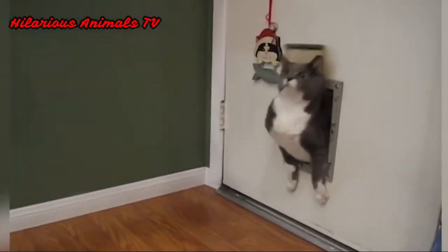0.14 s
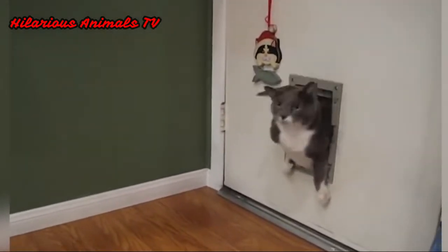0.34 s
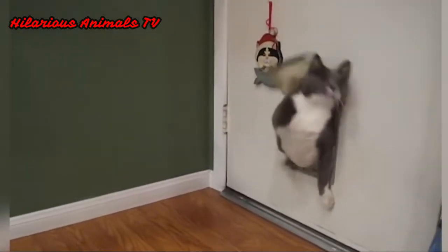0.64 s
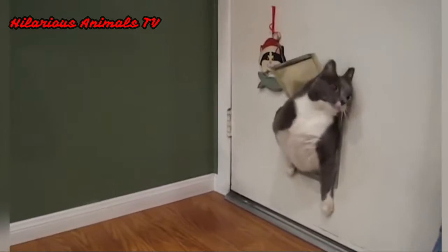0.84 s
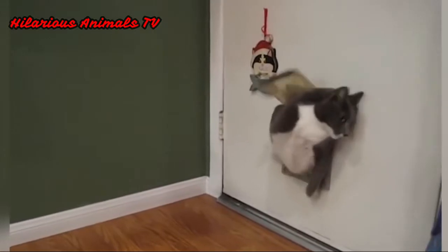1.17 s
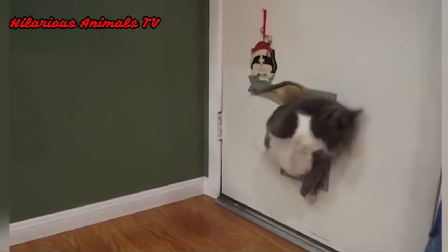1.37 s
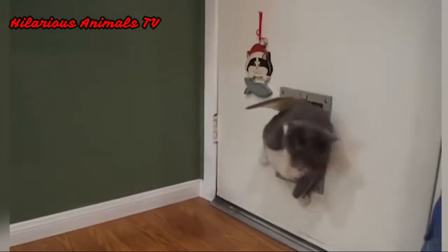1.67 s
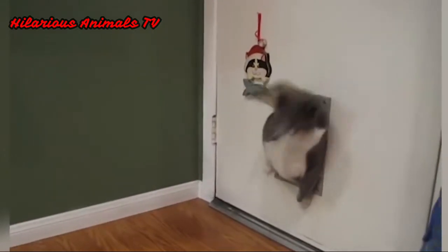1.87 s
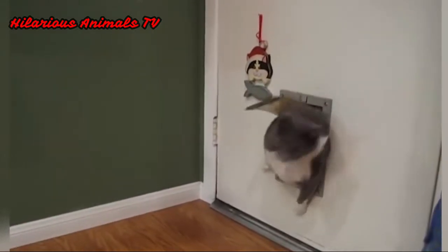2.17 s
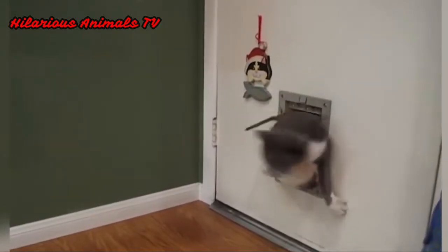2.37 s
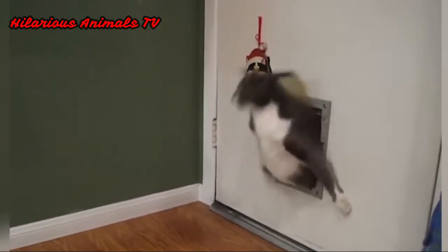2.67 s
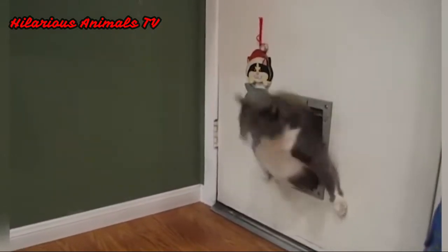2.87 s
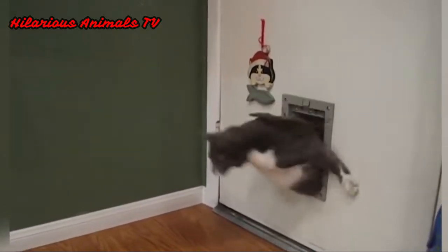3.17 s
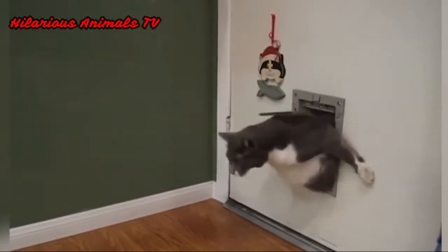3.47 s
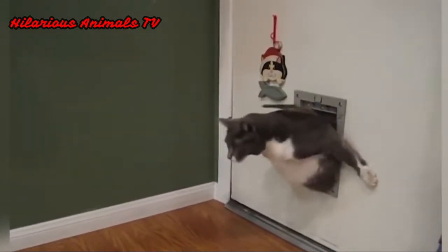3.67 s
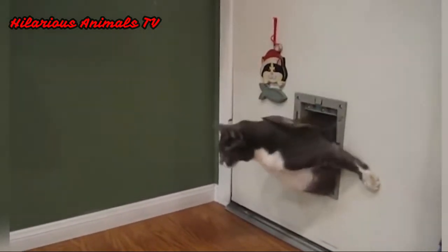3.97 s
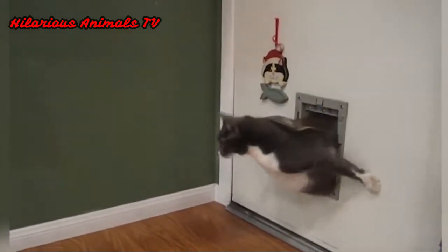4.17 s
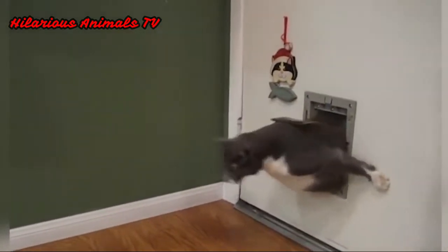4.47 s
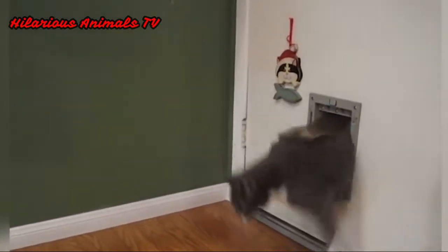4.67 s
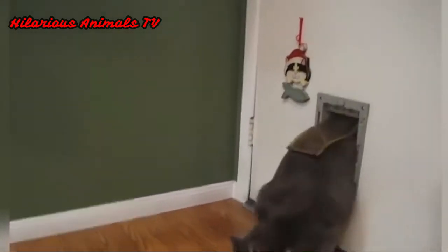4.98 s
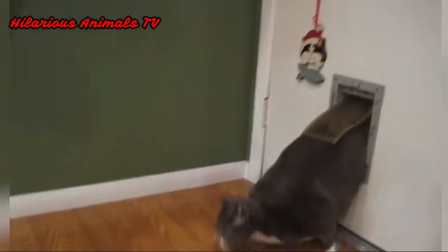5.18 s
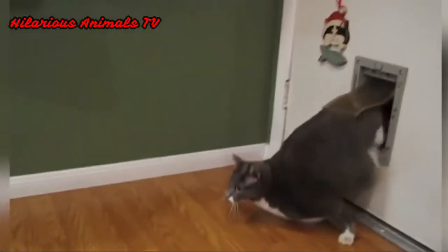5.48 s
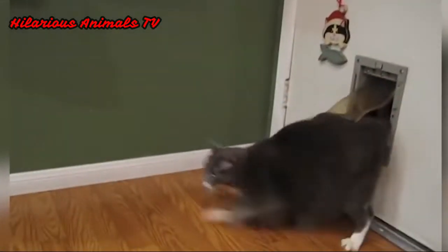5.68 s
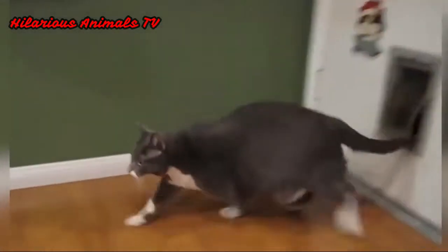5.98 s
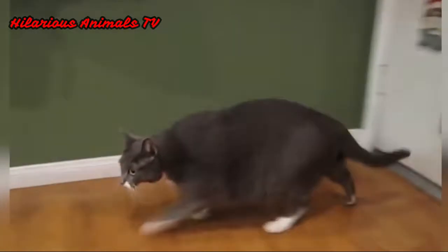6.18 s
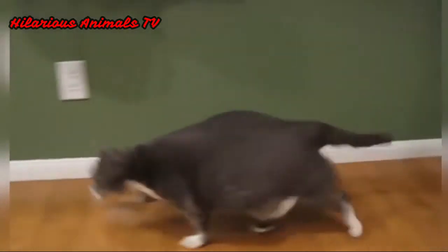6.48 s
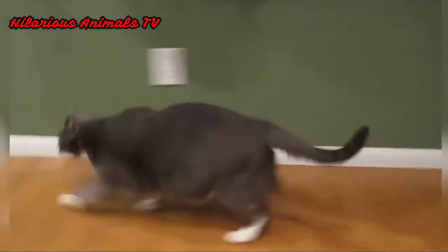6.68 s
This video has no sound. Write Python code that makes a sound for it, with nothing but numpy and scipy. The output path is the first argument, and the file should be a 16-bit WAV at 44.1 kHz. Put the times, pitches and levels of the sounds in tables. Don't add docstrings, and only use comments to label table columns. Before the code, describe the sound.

Hard plastic clicks and rattles crowd the first second, then hollow flap slaps come irregularly with scraping and soft thuds from a hollow door. The clatter tightens during the hardest pushes, peaks in one bright snap, then thins to knocks and light paw taps. A small hard room echoes each hit, heard from nearby over a low hum.

```python
import sys
import numpy as np
from scipy import signal
from scipy.fft import rfft, irfft
from scipy.io import wavfile
from scipy.ndimage import uniform_filter1d

SR = 44100
rng = np.random.default_rng(int(sys.argv[2]) if len(sys.argv) > 2 else 0)


def natural_amplitude(level_db):
    exponent = np.asarray(level_db, float) / 20
    return 10 ** exponent


def digitize_waveform(pressure):
    field = np.atleast_2d(pressure).T
    bounded = np.clip(field, -1, 1)
    quanta = np.round(bounded * 32767).astype(np.int16)
    wavfile.write(sys.argv[1], SR, quanta)


N = 301189

# frequency in Hz, level in dB per Hz.
HUM_SPECTRUM = [(15, -31), (25, 31.5), (64, -13.5), (263, 3), (677, -5.5), (1290, -3), (1480, -10),
                (1890, -6), (2050, -13), (3920, -14), (6050, -17.5), (14400, -27), (16000, -36)]
HUM_DB, HUM_PATCH_DB = -53.5, 2.4

# time in seconds, pressure in dB, claw scrape in dB over pressure.
SLIDING = [(0.0, -41, 15), (0.15, -44.5, -25), (0.28, -44, 0.5), (0.59, -43.5, -13), (1.06, -56.5, -1),
           (1.22, -47, -15), (1.45, -55, 5), (1.86, -48.5, -4.5), (1.98, -33.5, -4), (2.13, -54, -5.5),
           (2.78, -41, -6), (3.25, -49.5, -20), (3.48, -36, 3), (3.69, -51.5, -20), (4.11, -37.5, -15),
           (4.77, -49.5, -3), (5.14, -47.5, 6), (5.4, -48.5, -11)]
REST_S, REST_DB = 6.1, -6.5
GRIT_PER_S, GRIT_DB, GRIT_UNEVEN_DB = 120, -2.5, 3.0

# start in seconds, level in
# dB, ring in Hz, t60 in ms.
RAPS = [(.0005, -32, 4000, 8), (.0085, -29, 4100, 8), (.0145, -34, 4000, 8), (.02, -33, 4200, 8),
        (.038, -30, 4000, 8), (.043, -33, 4200, 8), (.2045, -31, 4200, 8), (.2245, -33, 4100, 8),
        (.728, -32, 260, 60), (.81, -31, 430, 50), (1.056, -25, 770, 50), (1.064, -28, 780, 30),
        (1.4078, -15, 1270, 22), (1.408, -22, 1800, 15), (1.416, -17, 1120, 22), (1.4215, -19, 920, 15),
        (1.431, -24, 1200, 20), (1.8785, -23, 600, 25), (1.952, -14, 780, 30), (1.954, -18, 1200, 25),
        (1.999, -21, 1000, 15), (2.538, -11, 4500, 8), (2.5375, -16, 7800, 5), (2.5375, -18, 14200, 4),
        (2.539, -13, 1700, 25), (2.544, -13, 760, 35), (2.551, -14, 800, 25), (4.0103, -29, 4070, 10),
        (4.0, -30, 3900, 8), (4.3, -31, 5300, 10), (4.312, -32, 5100, 10), (4.0292, -23, 4600, 8),
        (4.0342, -22, 4300, 8), (3.991, -28, 2200, 8), (4.039, -26, 5400, 8), (4.051, -27, 6100, 8),
        (4.047, -25, 4000, 12), (4.6025, -4, 4450, 8), (4.603, -13, 3500, 8), (4.603, -13.5, 1900, 12),
        (4.609, -20, 1120, 30), (4.617, -19, 4500, 10), (5.679, -37, 1300, 15), (5.681, -40, 3200, 10),
        (5.692, -23, 560, 30), (5.6925, -26, 1100, 20), (5.692, -29, 1760, 15), (5.72, -31, 600, 20),
        (2.538, -17, 3300, 10), (2.541, -17, 1370, 25), (3.257, -36, 4600, 8), (3.257, -38, 2600, 10),
             (3.2915, -22, 4000, 10), (3.2915, -28, 5600, 6), (3.4255, -21, 4700, 8), (3.426, -22, 3100, 8),
             (3.4255, -26, 7800, 5), (3.565, -33, 5500, 6), (3.642, -30, 7500, 5), (3.648, -23, 2800, 8),
             (3.648, -28, 1300, 12), (4.03, -28, 2900, 15), (4.045, -29, 3000, 12), (5.1, -30, 2850, 10),
             (5.1, -33, 900, 12), (5.118, -22, 1950, 12), (5.118, -27, 4400, 8), (5.118, -33, 6400, 6),
             (5.1265, -21, 1950, 10), (5.127, -21, 1000, 25), (5.128, -31, 6450, 8), (5.159, -32, 6750, 8)]
# start in seconds, level in dB, ring in Hz, t60 in ms.
THUMPS = [(.34, -36, 290, 80), (1.872, -27, 140, 200), (1.95, -33, 90, 200), (2.793, -31, 150, 120),
          (2.9, -34, 250, 120), (3.221, -28, 130, 120), (3.3, -33, 150, 200), (4.05, -38, 110, 250),
          (4.0, -37, 450, 60), (3.38, -34, 170, 150), (4.79, -36, 60, 300), (5.118, -30, 95, 200),
          (5.12, -27, 430, 60), (5.93, -46, 280, 80), (6.25, -43, 180, 100), (6.48, -43, 130, 120)]
RAP_RISE_CYCLES, RAP_PAIR_RATIO = .8, 1.09
RAP_BLUR, RAP_WALLS_DB = 2.5, -2.0

# start in seconds, level in dB, upper ring in dB over the tick.
RATTLES = [(0.0074, -29.5, -8.5), (0.0172, -37, -18), (0.0255, -27, -25), (0.0325, -26, -20),
           (0.047, -27, -14.5), (0.1017, -38, -13), (0.1531, -25.5, -31), (0.174, -21, -24),
           (0.1902, -20.5, -22), (0.2114, -19, -21), (0.229, -23, -19), (0.243, -24.5, -21),
           (0.268, -23, -20.5), (0.3927, -24, -19.5), (0.4057, -26, -34), (0.478, -27, -29),
           (0.484, -25.5, -29), (0.553, -26, -23), (0.5757, -21, -27), (0.707, -26.5, -31)]
# frequency in Hz, level in dB, t60 in seconds.
HINGE_LOW = [(3900, 4, 0.0033), (4350, 3, 0.0055), (5540, 2.5, 0.00087)]
# frequency in Hz, level in dB, t60 in seconds.
HINGE_HIGH = [(8760, -1, 0.0025), (10050, -7.5, 0.012), (10700, -2, 0.0039)]

# strongest push in seconds, boom in dB, build-up and let-go in seconds.
SHOVES = [(0.07, -32.5, 0.053, 0.23), (0.36, -32, .1, 0.22), (1.27, -36, 0.11, 0.3), (2.11, -44, .25, .12),
          (2.51, -21, 0.086, 0.019), (2.6, -44, .08, .5), (3.23, -29, 0.085, 0.13), (3.5, -22, 0.041, 0.12),
          (3.65, -27, 0.041, 0.12), (3.76, -27.5, .08, 0.038), (4.41, -28, .1, 0.31),
          (5.12, -35.5, 0.11, 0.21)]
# time in seconds, level in dB, let-go in seconds.
JOLTS = [(0.072, -26, 0.13), (0.36, -37, 0.33), (0.63, -34, .5), (1.88, -33, 0.11), (2.51, -38, 0.021),
         (2.61, -38, .9), (3.235, -24, 0.14), (3.65, -32.5, 0.22), (3.76, -33, .25), (4.41, -32.5, 0.29),
         (5.12, -28, 0.21)]
JOLT_RISE_S, SWELL_DB = 0.013, 15.5
SWAY_DB, STILL_DB, STRUGGLE_END_S = -43.5, -52.5, 3.75
PANEL_REST_DB = -51.5

# start in seconds, level in dB, ring in Hz, fizz in dB over the tick.
SNAPS = [(0.0756, -25, 3970, -23), (0.3381, -22, 4500, -23), (0.617, -23, 3480, -21.5),
         (1.0236, -33.5, 3850, -24), (1.044, -28.5, 3300, -20), (1.1758, -22, 3100, -33),
         (1.183, -20.5, 3450, -21.5), (1.269, -26, 3600, -29), (1.4072, -22, 3680, -20.5),
         (1.8895, -30.5, 3400, -31), (1.9469, -20, 4020, -10.5), (2.537, -16, 4150, -8.5),
         (2.536, -12, 4080, -19), (2.6847, -23, 4080, -27), (2.8768, -29, 4130, -13.5),
         (3.287, -22, 3960, -24), (3.376, -24, 3760, -25), (3.42, -23, 3530, -10), (3.5762, -28, 4300, -17),
         (3.6417, -28, 3900, -17), (4.1629, -18, 4300, -29), (4.267, -27, 3550, -28),
         (4.327, -35, 4900, -39), (4.6023, -9, 4300, -27), (4.7995, -30, 3080, -44),
         (5.1177, -31.5, 4270, -12.5), (5.1252, -23, 3700, -26), (5.16, -34, 3440, -13),
         (5.697, -34, 3500, -9), (6.0464, -41, 3300, -8.5)]
# start in seconds, level in dB, fizz in dB over the tick.
CLAWS = [(0.44, -35, -27), (0.5362, -34, -23), (0.806, -41, -16), (1.5503, -40, -14), (1.6815, -38, -21),
         (1.7644, -38.5, -20), (2.4843, -44.5, -13), (2.794, -32.5, -21), (2.842, -35, -24),
         (2.9723, -37, -24), (3.0803, -37, -38), (3.166, -45, -16), (3.2222, -37.5, -17),
         (3.3247, -28, -34), (3.402, -40, -12), (3.9062, -31, -25), (3.942, -30.5, -25.5),
         (4.3865, -44, -24), (4.435, -36.5, -16.5), (5.174, -35, -29), (5.803, -41.5, -13.5),
         (5.9828, -46, -8.5), (6.2798, -40.5, -14), (6.447, -56, -3.5), (6.541, -34.5, -21),
         (6.5457, -38.5, -20), (6.628, -47.5, -11), (6.6975, -36.5, -17), (6.8036, -47.5, -15)]
# multiple of the tick's own ring, level in dB, t60 in seconds.
LATCH = [(.8, 4.5, 0.00053), (1, 4, 0.0027), (1.17, -4.5, 0.0021)]
# frequency in Hz, level in dB, t60 in seconds.
FIZZ = [(6310, 23.5, 0.00063), (9650, 11, 0.0021), (9770, 7, 0.0032), (11460, 6, 0.0014),
        (14500, -3, 0.00039)]
SNAP_MS, SNAP_MS_PER_DB = 6.15, -0.19
CLAW_MS, CLAW_HZ, CLAW_SPREAD_HZ = 5.8, 3900, 67

# start in seconds, blow in dB,
# then door thud, hollow note and frame, each in dB over the blow.
SLAPS = [(0.3431, -26.5, -8.5, -19, -6), (0.3556, -29, -8.5, -19, -31), (0.616, -34, -12, -10, -1),
         (1.0275, -30.5, -9, -9, -2), (1.045, -28.5, -13.5, -5, -3), (1.188, -23, -22, -8.5, -9),
         (1.4078, -21, -16, -9, -11), (1.886, -29.5, -5, 2.5, -2.5), (1.9425, -25, -40, 0, -4.5),
         (1.9473, -19, -24, -12, -18), (2.537, -13.5, -13, -8, -6), (2.793, -31, -10, -1.5, -10),
         (2.906, -23, -10.5, -12, -15), (2.99, -26, -27, -13.5, -15), (3.2851, -23.5, -3.5, -9.5, -11),
         (3.423, -30.5, -5, 7, 2), (3.4965, -28.5, -6, -8, -8), (3.6469, -31, -6, -9.5, -3),
         (3.9909, -30.5, -9, -13, -3.5), (4.1646, -29.5, -3, -9.5, -4), (4.6025, -21, -30, -22, -7),
         (5.1172, -28, 2, -21, -1), (5.125, -22, -3, -12, -10), (5.692, -31, -3, -12, -11)]
# start in seconds, blow in dB, then door thud and frame in dB over the blow.
BUMPS = [(0.0764, -37.5, 1.5, -3), (0.537, -43, -9, -10), (0.6655, -35.5, -13, 0.5),
         (0.8053, -38.5, 5.5, -5.5), (1.1768, -38, -7, -2), (1.585, -37.5, -8.5, 2), (1.8718, -30, 6, -11),
         (2.6804, -32, -2, -1.5), (2.8399, -27.5, -2.5, -16), (3.2235, -38, -1, -8),
         (3.3734, -34, -2.5, -5), (3.8941, -38, -1, -17), (4.3286, -42.5, 4, 1), (4.796, -46.5, 0.5, -2),
         (4.9765, -38.5, -8, -2.5), (5.0998, -47, -12, 4), (5.8019, -42.5, 2, -17), (6.255, -56, 7, -12),
         (6.4468, -52, 1, 5), (6.8018, -42.5, -10, -6)]
SLAP_MS, BUMP_MS, BUMP_HOLLOW_DB = 16.3, 10.4, -9.5
# frequency in Hz, level in dB, t60 in seconds.
FLAP = [(820, -6, .012), (1000, -2, .011), (1200, 3, .012), (1400, 1, .009), (1640, -3, .008)]
# frequency in Hz, level in dB, t60 in seconds.
HOLLOW = [(765, 0, .045), (860, -9, .025)]
# level in dB, first as heard straight, then towards the walls.
HOLLOW_DB = [
    [6.0],
    [-1.0],
]
# frequency in Hz, level in dB, t60 in seconds.
FRAME = [(1754, -3.5, 0.0061), (2220, 5, 0.003), (2560, 3.5, 0.004), (3255, -5.5, 0.0031)]
# frequency in Hz, level in dB, t60 in seconds.
DOOR = [(142.7, 2, 0.052), (208, -10, 0.03), (317.4, -3.5, 0.1), (423, 2, 0.033), (618, -3, 0.036)]

# start in seconds, level in dB,
# centre at the start in Hz, centre at the end in Hz, length in ms.
SWISHES = [(1.574, -43, 3200, 2960, 43), (1.763, -45, 2850, 2520, 38), (2.889, -38, 3140, 3750, 44),
           (3.155, -47, 3280, 3400, 30), (3.564, -33.5, 4100, 4240, 39), (4.0, -33, 3300, 5600, 60),
           (4.29, -42.5, 5030, 4940, 41), (4.489, -41, 3660, 3820, 55), (5.002, -43.5, 2430, 3200, 66),
           (4.985, -45, 1190, 1390, 76), (5.33, -50.5, 312, 342, 144), (4.005, -39, 2300, 1700, 90),
           (1.031, -45, 3060, 3060, 27), (2.961, -40, 1090, 1110, 58)]

# delay in ms, level in dB.
WALLS = [(4.6, -15.5), (8.5, -12.5), (14.5, -15.5), (19, -47), (27, -76)]
# frequency in Hz, t60 in seconds.
ROOM = [(100, 0.3), (260, 0.23), (700, 0.41), (1840, 0.35), (4850, 0.29), (12800, 0.21)]


def evened(x):
    return x / np.sqrt(np.mean(x ** 2) + 1e-20)


def read(points, hz):
    f, value = np.transpose(points)
    return np.interp(np.log(hz + 1), np.log(f + 1), value)


def curves(rows):
    s, *columns = np.transpose(rows)
    return [np.interp(np.arange(N) / SR, s, c) for c in columns]


def add(mix, s, sound):
    part = mix[..., max(round(s * SR), 0):][..., :sound.shape[-1]]
    part += sound[..., :part.shape[-1]]


def band(x, lo_hz, hi_hz):
    edges = [lo_hz, min(hi_hz, .45 * SR)]
    return evened(signal.sosfilt(signal.butter(2, edges, "bandpass", fs=SR, output="sos"), x))


def struck(modes, scale, contact_ms, luck, scatter_db=2.5, first=4.3):
    t = np.arange(len(luck)) / SR
    ring = np.zeros(len(luck))
    for k, (hz, db, t60) in enumerate(modes):
        fade = natural_amplitude(db + scatter_db * luck[k] - 60 * t / t60)
        ring += (-1) ** k * fade * np.sin(2 * np.pi * hz * scale * t)
    life = t[:3072] / (np.clip(contact_ms, .3, 40) / 1000)
    chatter = luck[:3072] * np.minimum(life * 6.6, 1) * np.exp(-1.6 * life ** 1.26)
    chatter[8] = first
    colour = rfft(chatter)
    chatter = irfft(colour / (np.abs(colour) + 1e-9) ** 0.46)
    heard = signal.fftconvolve(chatter, ring)[:len(t)]
    spread = ring * np.linalg.norm(heard) / np.linalg.norm(ring)
    return np.array([heard, spread]) / np.abs(heard).max()


def slips(size, luck, uneven_db=3.5):
    grip = natural_amplitude(uneven_db * np.minimum(luck[1, :size // 64 + 1] ** 2, 4)).repeat(64)[:size]
    return luck[0, :size] * grip


def hum():
    frames, hz = N // 256 + 5, np.fft.rfftfreq(1024, 1 / SR)
    a, b, patches = rng.standard_normal((frames, 513, 3)).T
    patches = uniform_filter1d(patches, size=12, axis=0)
    patches = evened(uniform_filter1d(patches, size=14, axis=1))
    z = (a + 1j * b) * natural_amplitude(read(HUM_SPECTRUM, hz)[:, None] + HUM_PATCH_DB * patches)
    return natural_amplitude(HUM_DB) * evened(signal.istft(z, nperseg=1024, noverlap=768)[1][:N])


def rub():
    dull_db, scrape_db = curves(SLIDING + [(REST_S, SLIDING[-1][1] + REST_DB, SLIDING[-1][2])])
    bright_db = dull_db + scrape_db
    dull, bright = (slips(N, luck) for luck in rng.standard_normal((2, 2, N)))
    flap = evened(band(dull, 733, 1370) + 1.6 * band(dull, 376, 2530))
    frame = evened(band(bright, 3370, 4420) + 1.5 * band(band(bright, 990, 8100), 1300, 14300))
    return natural_amplitude(dull_db - 6.5) * flap + natural_amplitude(bright_db - 13.5) * frame


def grit():
    pressure_db = curves(SLIDING + [(REST_S, SLIDING[-1][1] - 15.0, 0)])[0]
    where, size = rng.random((2, 3, N))
    crackle_db = pressure_db + GRIT_DB - GRIT_UNEVEN_DB * np.log(size + 0.041)
    train = (where < GRIT_PER_S / 3 / SR) * natural_amplitude(crackle_db)
    luck = rng.standard_normal((3, 2, 4096))
    snaps = []
    for hz, (a, b) in zip((2600, 4100, 5200), luck):
        fizz = natural_amplitude(-13.0) * struck(FIZZ, 0.95, 0.75, b)[0, :600]
        snaps.append(struck(LATCH, hz, 1.5, a)[0, :600] + fizz)
    return signal.oaconvolve(train, np.array(snaps), axes=1)[:, :N].sum(0)


def raps():
    mix, t = np.zeros((2, N)), np.arange(8192) / SR
    for s, db, hz, ms in RAPS + THUMPS:
        pair = np.sin(2 * np.pi * hz * t) + .6 * np.sin(2 * np.pi * hz * RAP_PAIR_RATIO * t)
        fade_db = 60000 * t / max(ms, 1) * np.array([[1], [RAP_BLUR]])
        fade_db = fade_db - np.array([[0], [RAP_WALLS_DB]])
        add(mix, s, natural_amplitude(db - fade_db) * np.tanh(hz * t / RAP_RISE_CYCLES) * pair)
    return mix


def rattle():
    mix = np.zeros((2, N))
    for (s, db, top_db), luck in zip(RATTLES, rng.standard_normal((len(RATTLES), 2, 3072))):
        low = struck(HINGE_LOW, 0.98, 1.5, luck[0], first=3.4)
        high = natural_amplitude(top_db + 12.0) * struck(HINGE_HIGH, 0.94, 3.6, luck[1], first=2.34)
        add(mix, s, natural_amplitude(db - 2.5) * (low + high))
    return mix


def pushes(rows, floor_db):
    t = np.arange(N) / SR
    ramps = []
    for s, db, rise, fall in rows:
        distance = np.maximum((s - t) / max(rise, .005), (t - s) / max(fall, .005))
        ramps.append(db - SWELL_DB * distance)
    return np.maximum(np.max(ramps, axis=0), floor_db)


def heave():
    sway_db, = curves([(STRUGGLE_END_S - .3, SWAY_DB), (STRUGGLE_END_S + .3, STILL_DB)])
    boom_db = pushes(SHOVES, sway_db)
    panel_db = pushes([(s, db, JOLT_RISE_S, fall) for s, db, fall in JOLTS], PANEL_REST_DB)
    push = rng.standard_normal((2, N))
    boom = evened(band(push[0], 33.5, 81.5) + 0.4 * band(push[0], 27, 43))
    panel = evened(band(push[1], 127.0, 169) + 1.63 * band(push[1], 51, 426))
    return natural_amplitude(boom_db - 4.5) * boom + natural_amplitude(panel_db - 10.5) * panel


def ticks():
    mix = np.zeros((2, N))
    taps = [(*row, SNAP_MS + SNAP_MS_PER_DB * (row[1] + 25)) for row in SNAPS]
    for s, db, fizz_db in CLAWS:
        taps.append((s, db, CLAW_HZ + CLAW_SPREAD_HZ * rng.uniform(-0.37, 1), fizz_db, CLAW_MS))
    for (s, db, hz, fizz_db, ms), luck in zip(taps, rng.standard_normal((len(taps), 2, 3072))):
        brightness = np.clip(1 + 0.013 * (db + 21.0), .85, 1.15)
        fizz = natural_amplitude(fizz_db + 15.5) * struck(FIZZ, brightness, ms, luck[1])
        add(mix, s, natural_amplitude(db + 1.0) * (struck(LATCH, hz, ms, luck[0]) + fizz))
    return mix


def knocks():
    mix = np.zeros((2, N))
    blows = [(*row, SLAP_MS) for row in SLAPS]
    blows += [(s, db, door_db, BUMP_HOLLOW_DB, frame_db, BUMP_MS) for s, db, door_db, frame_db in BUMPS]
    lucks = rng.standard_normal((len(blows), 4, 8192))
    for (s, db, door_db, hollow_db, frame_db, ms), luck in zip(blows, lucks):
        flap_pitch = np.clip(1.0 - 0.0054 * (hollow_db + 9.0), .9, 1.1)
        flap = struck(FLAP, flap_pitch, ms, luck[0])
        hollow = natural_amplitude(hollow_db + np.array(HOLLOW_DB)) * struck(HOLLOW, 1.0, ms, luck[3])
        frame = natural_amplitude(frame_db + 5.5) * struck(FRAME, 1, 1.15 * ms, luck[1])
        door = natural_amplitude(door_db + 5.0) * struck(DOOR, 1, 0.61 * ms, luck[2])
        add(mix, s, natural_amplitude(db - 2.0) * (flap + hollow + frame + door))
    return mix


def resonate(x, hz, width_hz):
    turn = np.exp(2j * np.pi * np.cumsum(hz) / SR)
    r = np.exp(-np.pi * width_hz / SR)
    smooth = signal.lfilter([1], np.convolve([1, -r], [1, -r]), x / turn)
    return evened((turn * smooth).real)


def swishes():
    mix = np.zeros(N)
    lucks = rng.standard_normal((len(SWISHES), 2, 8192))
    for (s, db, from_hz, to_hz, ms), luck in zip(SWISHES, lucks):
        size = min(int(ms * SR / 1000), 8192)
        drive = slips(size, luck, uneven_db=4.0)
        stroke = resonate(drive, np.linspace(from_hz, to_hz, size), 0.71 * from_hz)
        stroke = stroke + 0.7 * band(drive, 0.31 * from_hz, 0.92 * to_hz)
        stroke = band(stroke, 0.3 * from_hz, 1.4 * to_hz)
        swell = np.sin(np.linspace(0, 1, size) ** 0.72 * np.pi)
        add(mix, s, natural_amplitude(db) * stroke * swell)
    return mix


def room(heard, spread, tail_db=-1.0):
    out = heard.copy()
    for ms, db in WALLS:
        add(out, ms / 1000, natural_amplitude(db) * heard)
    size = SR // 2
    taps = np.zeros((3, size))
    at = np.arange(200, size - 20, 20)
    at = at + rng.integers(0, 20, (3, len(at)))
    np.put_along_axis(taps, at, rng.choice([-1., 1.], at.shape), 1)
    hz, t, z = signal.stft(taps, SR, nperseg=512)
    fade = natural_amplitude(-60 * t / read(ROOM, hz)[:, None])
    tails = signal.istft(z * fade, SR, nperseg=512)[1]
    turns = 2 * np.pi * (7 * np.arange(N) / SR + np.arange(3)[:, None] / 3)
    fed = spread * np.sqrt(2 / 3) * np.cos(turns)
    tail = signal.fftconvolve(fed, tails / np.linalg.norm(tails[0]), axes=1)[:, :N].sum(0)
    return out + natural_amplitude(tail_db) * tail


def toward_walls(db):
    return natural_amplitude(np.array([[0], [db]]))


def scene():
    small = ticks() * toward_walls(-4.0) + (rattle() + grit()) * toward_walls(-11.0)
    heard, spread = knocks() + raps() + small + rub() + swishes() * toward_walls(-3.0)
    return (room(heard, spread) + heave() + hum())[None]


def top_cut(x):
    return signal.sosfilt(signal.butter(12, 16530, fs=SR, output="sos"), x)


def record(dry):
    limited = signal.oaconvolve(dry, signal.firwin(255, 16200, fs=SR)[None], "same")
    return top_cut(limited)


dry = scene()
out = record(dry)
digitize_waveform(out)
```